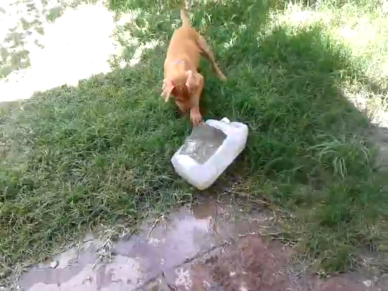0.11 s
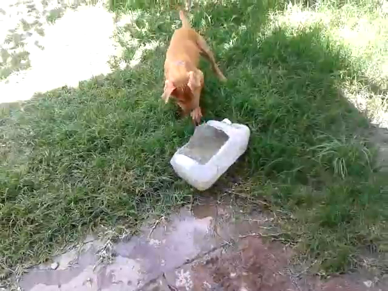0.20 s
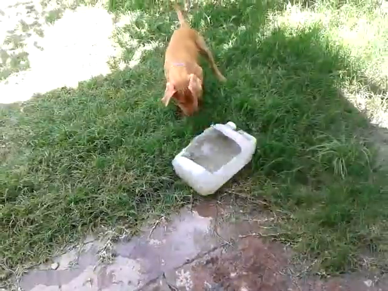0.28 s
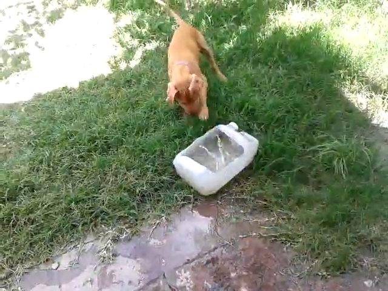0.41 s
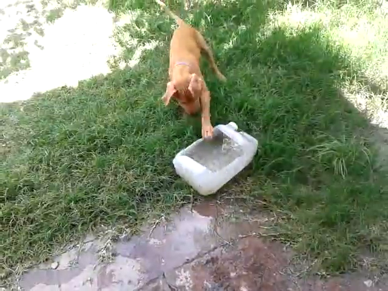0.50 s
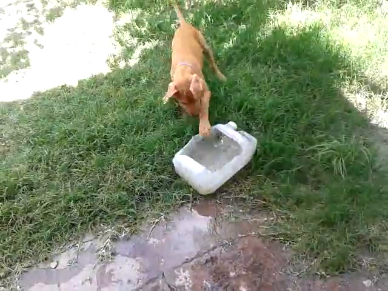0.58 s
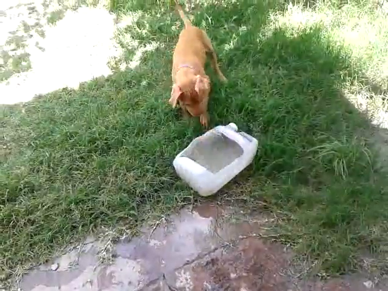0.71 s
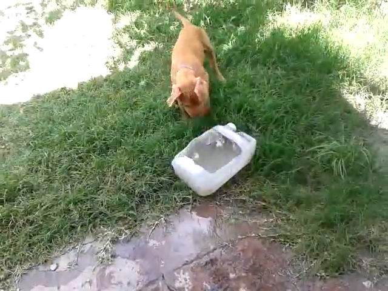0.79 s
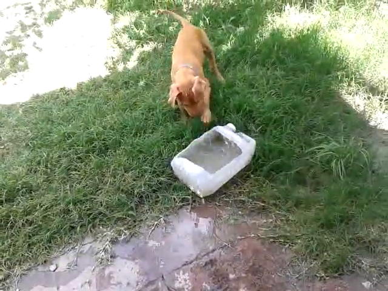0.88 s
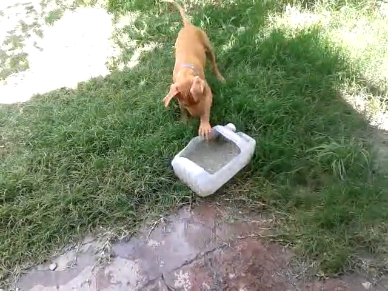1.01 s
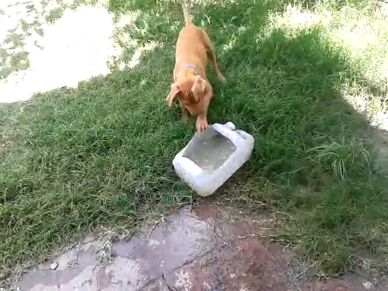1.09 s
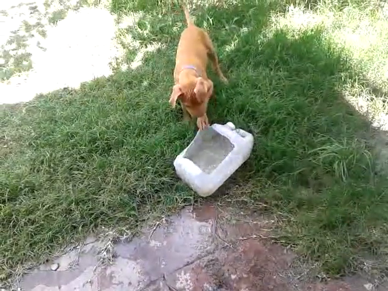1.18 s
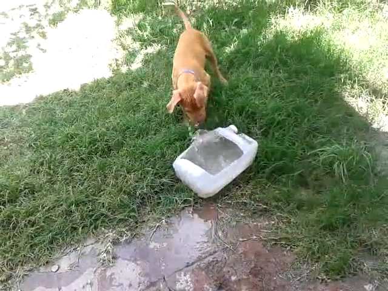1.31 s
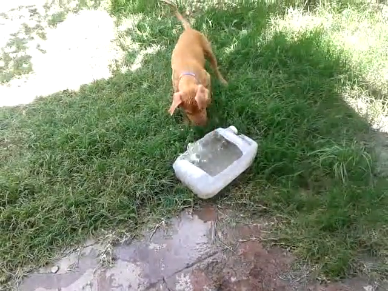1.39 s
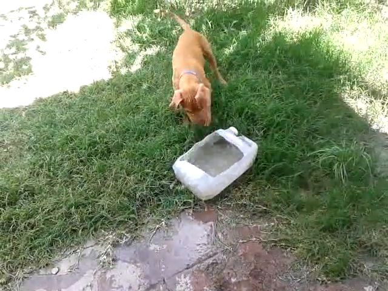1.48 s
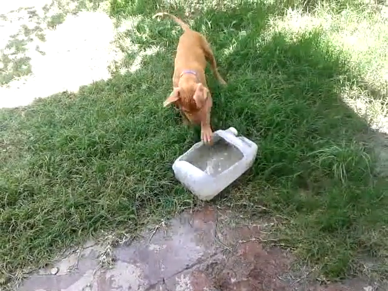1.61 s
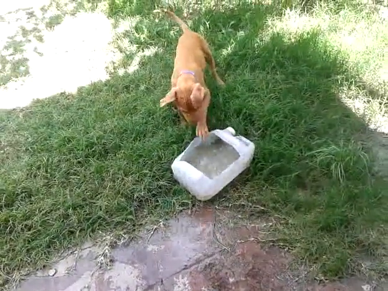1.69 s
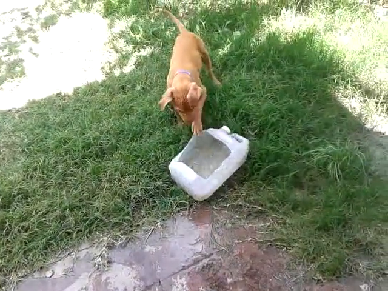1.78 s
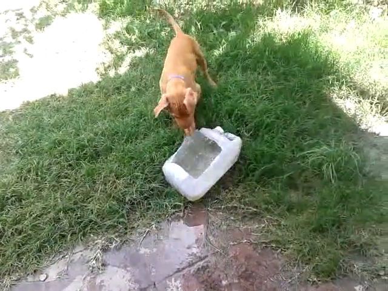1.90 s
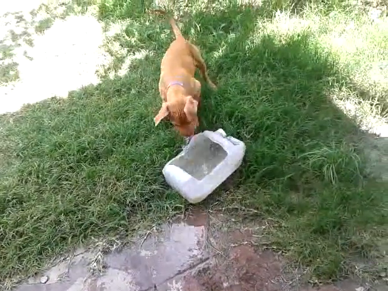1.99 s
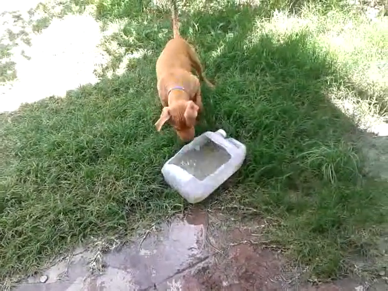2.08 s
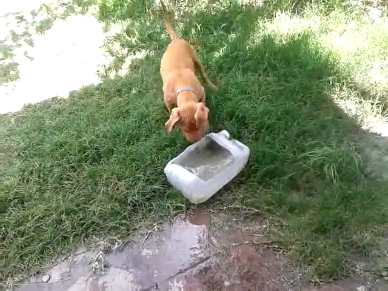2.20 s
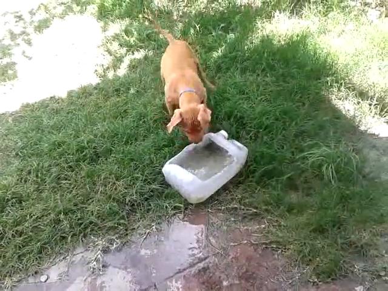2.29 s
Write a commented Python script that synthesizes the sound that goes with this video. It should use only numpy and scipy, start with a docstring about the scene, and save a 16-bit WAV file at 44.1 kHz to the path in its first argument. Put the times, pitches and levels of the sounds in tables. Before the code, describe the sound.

Hollow plastic knocks from a puppy pawing a cut-open jug of water outdoors. Strong, short clacks come at 0.2 and 0.27 seconds, the second loudest. Faint plinks, scrapes and light taps follow until softer knocks with low glugs around 1.27 to 1.36, then clicky taps near 1.85 and a hollow pair at 2.03. Quiet hiss, slow low rumble and a barely audible insect buzz lie beneath.

```python
"""Knocks on a cut-open plastic jug holding some water: a puppy paws at it, claws striking the walls.
Each blow rings the jug's modes briefly, then they shudder on unevenly in low hollow tones; a noise tick tops it.
The water plinks and glugs as short rising tones; scrapes are random slips through the damped jug modes.
Underneath lie throbbing band noise (far insects), coloured hiss and a slow low outdoor rumble."""
import sys
import numpy as np
from scipy import signal
from scipy.fft import rfft, irfft
from scipy.io import wavfile
from scipy.ndimage import uniform_filter1d

SR = 44100
rng = np.random.default_rng(int(sys.argv[2]) if len(sys.argv) > 2 else 0)


def put_to_file(sound):
    """Save the sound as 16-bit audio at rate SR, in the file named by the first command-line argument."""
    columns = np.atleast_2d(sound).T  # one column per channel
    safe = np.clip(columns, -1, 1)
    whole_steps = np.round(safe * 32767)
    wavfile.write(sys.argv[1], SR, whole_steps.astype(np.int16))


N = 103635

# claw blows; hollow and bright levels are relative to the wall tones:
# start_s, level_db, contact_s, hollow_pitch_hz, hollow_db, bright_db
KNOCKS = [(.010, -34.5, 0.00055, 670, -1.5, 3.5), (0.1992, -10, 0.00098, 710, -10.5, 1.5),
          (.269, -14.5, 0.00092, 800, -7, 4), (0.2739, -5, 0.00091, 490, -16, -6.5),
          (0.72, -33.5, 0.0022, 500, -22, -3), (0.770, -37, 0.00066, 673, 12.5, -18),
          (0.968, -48, 0.00072, 470, -13, 15), (1.118, -40, 0.00037, 414, 6, 5.5),
          (1.214, -40, 0.00083, 250, 5.5, 0), (1.269, -23.5, 0.0011, 304, -4.5, -3),
          (1.281, -18, 0.00059, 850, -4.5, -16), (1.344, -20, 0.00322, 587, 3, 0),
          (1.361, -25, 0.00158, 680, 7.5, 7), (1.611, -34.5, 0.0028, 397, -21, -3),
          (1.835, -22, 0.001, 670, -7.5, -5.5), (1.872, -52, 0.0013, 398, 6, 11),
          (1.882, -21, 0.00028, 604, -4.5, -2.5), (2.023, -19, 0.0013, 840, 2.5, 4.5),
          (2.051, -18.5, 0.0013, 777, 1.5, 0), (2.272, -34.5, 0.0029, 785, -6.5, 4.5)]
# modes of the jug: pitch_hz, level_db, t60_s
JUG_MODES = [(208, -3, 0.088), (283, 3, 0.026), (385.7, 1.5, 0.046), (474, -5.5, 0.13), (580.2, -9, 0.093),
             (691, 4, 0.037), (861.4, 5.5, 0.024), (1019, -3, 0.031), (1375, -1, 0.026),
             (1497.5, 8, 0.0099), (1748, 3, 0.02), (2159, 0, 0.027), (2514, 2.5, 0.014), (3083, 0, 0.015),
             (3540, -9, 0.022)]
# plinks and glugs of the water, and a few small ticks: start_s, level_db, start_pitch_hz
BLIPS = [(0.282, -28.5, 463), (.298, -29.5, 620), (0.552, -40.5, 1850), (0.572, -39.5, 1457),
         (.609, -38.5, 722), (.624, -44, 307), (0.633, -40, 3360), (0.729, -41, 1390), (.749, -46, 1470),
         (0.769, -25.5, 373), (.772, -31, 957), (0.829, -43, 1350), (1.027, -44.5, 846), (1.062, -46, 1560),
         (1.265, -35.5, 184), (1.345, -24, 681), (1.363, -24, 706), (1.367, -29, 376), (1.379, -32.5, 708),
         (1.449, -38.5, 285), (1.529, -46.5, 1644), (1.543, -44.5, 2415), (1.616, -43.5, 390),
         (1.666, -43, 1543), (1.729, -47.5, 2890), (1.896, -32.5, 335.7), (2.025, -24, 758),
         (2.027, -36, 345), (2.052, -25, 347.5), (2.069, -36, 874), (2.176, -44, 1667)]
# pad scrapes and water sloshes: start_s, length_s, level_db, tilt_db_per_octave
SCRAPES = [(0.315, 0.081, -49, -1), (0.468, 0.053, -53, 5), (0.534, 0.1, -47, -2), (0.61, 0.11, -47, -2.5),
           (0.717, 0.065, -49, 2), (1.027, 0.07, -51, -1.5), (1.259, 0.043, -48.5, -6.5),
           (1.337, 0.016, -39, 3.5), (1.344, .16, -57, -6.5), (1.53, 0.059, -55.5, 7),
           (1.588, 0.16, -54.5, -2.5), (1.732, 0.032, -59, 9), (2.29, 0.19, -48, 3.5)]
# spectrum of the hiss and far traffic, before HISS_DB: pitch_hz, relative_density_db
HISS_SPECTRUM = [(100, 20.5), (250, 17.5), (600, 8.5), (1200, 5), (2200, 2.5), (3200, 0), (4200, -5),
                 (8000, -6.5), (15500, -12.5)]
# rms level of the rumble over time: time_s, level_db
RUMBLE_LEVEL = [(0, -50.5), (.9, -46), (1.7, -50), (2.35, -53)]
# broad resonances of the rumble: pitch_hz, width_hz, relative_level_db
RUMBLE_TONES = [(38.3, 10.2, 1), (63.3, 50, -4)]

RING_SAMPLES = int(.3 * SR)
WALL_HZ, BRIGHT_HZ = 1404, 2750
HOLLOW_OCT, WALL_OCT, BRIGHT_OCT = 0.74, 0.28, 0.33  # spread of a blow over the modes round each centre
SPOT_SD_DB, DETUNE_SD = 1.5, .025  # each blow lands elsewhere; detune as a fraction of pitch
SWELL_CYCLES = 0.1  # low modes build up later
SHUDDER_DB, SHUDDER_T60_RATIO, SHUDDER_RISE_S = -5.5, 4.55, 0.014
SHUDDER_PER_S = 340  # smoothing rate of the unevenness
TICK_DB, TICK_T60_S = -10.5, 0.0056
TICK_TAIL_DB, TICK_TAIL_T60_S = -7, 0.028
TREBLE_LOW_HZ, TREBLE_TOP_HZ = 4100, 7400
BLIP_GLIDE_PER_S, BLIP_FLUTTER_RMS = 4, .4  # fractions of the start pitch and of the amplitude
BLIP_T60_1KHZ_S, BLIP_T60_POWER, BLIP_ATTACK_CYCLES = 0.065, 0.097, 0.73
SLIPS_PER_S, SLIP_SCATTER_DB = 600, 3.5
SCRAPE_T60_RATIO, SCRAPE_TOP_HZ, FIZZ_DB = 0.35, 4120, -14
INSECT_HZ, INSECT_WIDTH_HZ, INSECT_THROBS_PER_S, INSECT_DB = 2070, 680, 81, -63.5
HISS_DB = -55
TOP_HZ = 15650


def knocks():
    """A blow swells each jug mode over the contact; it rings out and shudders on while the claw ticks."""
    out, t = np.zeros(N), np.arange(RING_SAMPLES) / SR
    hz, mode_db, t60_s = np.array(JUG_MODES).T[:, :, None]
    for start_s, level_db, contact_s, hollow_hz, hollow_db, bright_db in KNOCKS:
        spot, tune, phase = rng.standard_normal((3, len(JUG_MODES), 1))
        hollow = undb(hollow_db) * bump(hz, hollow_hz, HOLLOW_OCT)
        wall = bump(hz, WALL_HZ, WALL_OCT)
        bright = undb(bright_db) * bump(hz, BRIGHT_HZ, BRIGHT_OCT)
        share = hollow + wall + bright

        rise_s = max(contact_s, 2e-4) + SWELL_CYCLES / hz
        swell = (1 - np.exp(-t / rise_s)) ** 2
        ring = swell * decay(np.maximum(t - 2 * rise_s, 0), t60_s)
        tone = np.exp(2j * np.pi * (hz * (1 + DETUNE_SD * tune) * t + phase))
        modes = ((ring + shudder(t, t60_s)) * tone).imag
        body = np.sum(share * undb(mode_db + SPOT_SD_DB * spot) * modes, axis=0)
        body = body / np.abs(body).max() * share.max()

        tick = claw_tick(t, swell[-1]) * undb(TICK_DB + bright_db)
        add(out, undb(level_db) * (body + tick), start_s)
    return out


def shudder(t, t60_s):
    """Slow complex noise per mode: its amplitude and phase wander as it builds up and outlasts the ring."""
    step = int(SR / SHUDDER_PER_S)
    wobble = rng.standard_normal((2, len(JUG_MODES), RING_SAMPLES))
    wobble = uniform_filter1d(uniform_filter1d(wobble, step), step) * np.sqrt(step)
    envelope = (1 - np.exp(-t / SHUDDER_RISE_S)) * decay(t, t60_s * SHUDDER_T60_RATIO)
    return undb(SHUDDER_DB) * envelope * (wobble[0] + 1j * wobble[1])


def claw_tick(t, swell):
    """Treble noise that builds with the contact and dies in a fast and a slow stage."""
    fade = decay(t, TICK_T60_S) + undb(TICK_TAIL_DB) * decay(t, TICK_TAIL_T60_S)
    return treble(rng.standard_normal(RING_SAMPLES)) * swell * fade


def blips():
    """An unsteady short tone rises in pitch, as a water bubble does when it nears the surface; lower tones ring
    longer."""
    out, t = np.zeros(N), np.arange(RING_SAMPLES // 2) / SR
    for start_s, level_db, hz in BLIPS:
        attack = (1 - np.exp(-t * hz / BLIP_ATTACK_CYCLES)) ** 2
        shape = attack * decay(t, BLIP_T60_1KHZ_S * (1e3 / hz) ** BLIP_T60_POWER)
        flutter = 1 + BLIP_FLUTTER_RMS * unit(uniform_filter1d(rng.standard_normal(len(t)), size=150))
        tone = np.sin(2 * np.pi * hz * (t + BLIP_GLIDE_PER_S * t ** 2 / 2))
        add(out, undb(level_db) * flutter * shape / shape.max() * tone, start_s)
    return out


def scrapes():
    """Dense uneven slips excite the damped jug modes while a pad or the water rubs; spray fizzes."""
    start_s, length_s, level_db, tilt_db = np.array(SCRAPES).T[:, :, None]
    progress = np.clip((np.arange(N) / SR - start_s) / length_s, 0, 1)
    rub = np.sin(np.pi * progress ** 0.67)
    fizz_level = np.sum(rub * undb(level_db + tilt_db + FIZZ_DB), axis=0)
    fizz = fizz_level * unit(treble(rng.standard_normal(N)))

    body = np.zeros(N)
    for hz, mode_db, t60_s in JUG_MODES:
        slip_db = SLIP_SCATTER_DB * rng.exponential(size=N)
        slips = (rng.random(N) < SLIPS_PER_S / SR) * rng.standard_normal(N) * undb(slip_db)
        radius = decay(1 / SR, t60_s * SCRAPE_T60_RATIO)
        poles = [1, -2 * radius * np.cos(2 * np.pi * hz / SR), radius * radius]
        # filtered twice: a soft wet contact
        tone = signal.lfilter([1, -1], poles, signal.lfilter([1, -1], poles, slips))
        tilted_db = level_db + tilt_db * np.log2(hz / WALL_HZ) + mode_db
        body += unit(tone) * np.sum(rub * undb(tilted_db), axis=0) / np.sqrt(len(JUG_MODES))
    return fizz + signal.sosfilt(signal.butter(6, SCRAPE_TOP_HZ, fs=SR, output="sos"), body)


def insects():
    """A faint far buzz: a band of noise that throbs at a wandering rate."""
    edges_hz = [INSECT_HZ - INSECT_WIDTH_HZ / 2, INSECT_HZ + INSECT_WIDTH_HZ / 2]
    band = signal.butter(2, edges_hz, "band", fs=SR, output="sos")
    wander = unit(uniform_filter1d(rng.standard_normal(N), size=2000))
    throbs_per_s = INSECT_THROBS_PER_S * (1 + 0.235 * wander)
    throb = (1 + np.sin(2 * np.pi * np.cumsum(throbs_per_s) / SR)) ** 2
    return unit(signal.sosfilt(band, rng.standard_normal(N)) * throb) * undb(INSECT_DB)


def hiss():
    """Steady noise coloured by the spectrum of microphone hiss and far traffic, cut below 60 Hz."""
    f = np.fft.rfftfreq(N, 1 / SR) + 1  # offset keeps the log finite
    hz, density_db = np.array(HISS_SPECTRUM).T
    colour = undb(np.interp(np.log(f), np.log(hz), density_db)) * (f > 60)
    return irfft(rfft(rng.standard_normal(N)) * colour, N) * undb(HISS_DB)


def rumble():
    """Noise shaped by two broad low resonances; its level drifts slowly."""
    f = np.fft.rfftfreq(N, 1 / SR) + 1
    shape = sum(undb(level_db) / (1 + (2 * (f - hz) / width_hz) ** 2)
                for hz, width_hz, level_db in RUMBLE_TONES)
    noise = unit(irfft(rfft(rng.standard_normal(N)) * shape, N))
    return noise * undb(np.interp(np.arange(N) / SR, *np.array(RUMBLE_LEVEL).T))


def undb(db):
    """Amplitude from decibels."""
    return 10 ** (np.asarray(db) / 20)


def decay(t, t60_s):
    """Exponential fall of 60 dB in t60_s, floored at 3 ms."""
    return np.exp(-np.log(1000) * t / np.maximum(t60_s, .003))


def unit(x):
    """Scale to unit rms."""
    return x / np.sqrt(np.mean(x ** 2))


def bump(hz, centre_hz, octaves):
    """Gaussian weight on a log-frequency axis."""
    return np.exp(-(np.log2(hz / centre_hz) / octaves) ** 2 / 2)


def treble(x):
    """Keep the band above the jug's modes."""
    x = signal.sosfilt(signal.butter(4, TREBLE_LOW_HZ, "high", fs=SR, output="sos"), x)
    return signal.sosfilt(signal.butter(2, TREBLE_TOP_HZ, fs=SR, output="sos"), x)


def add(out, x, start_s):
    """Mix x into out at start_s."""
    i = max(int(start_s * SR), 0)
    out[i:i + len(x)] += x[:N - i]


def scene():
    """Sum the sources into one channel."""
    return (knocks() + blips() + scrapes() + insects() + hiss() + rumble())[None]


def record(dry):
    """A steep low-pass: the phone microphone cuts the top."""
    return signal.sosfilt(signal.ellip(14, .2, 80, TOP_HZ, fs=SR, output="sos"), dry)


dry = scene()
out = record(dry)
put_to_file(out)
```